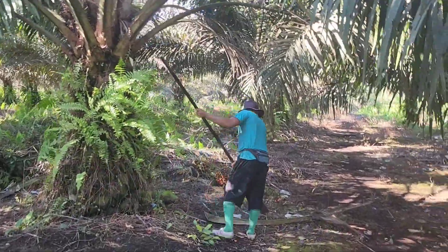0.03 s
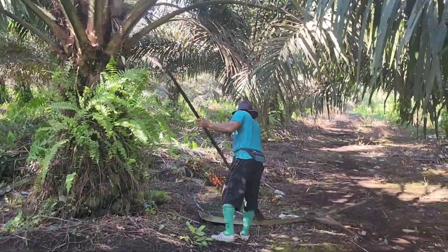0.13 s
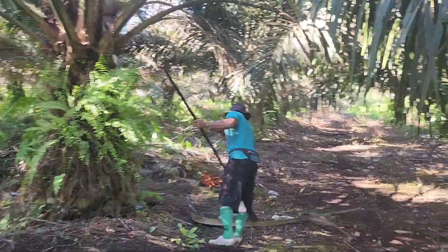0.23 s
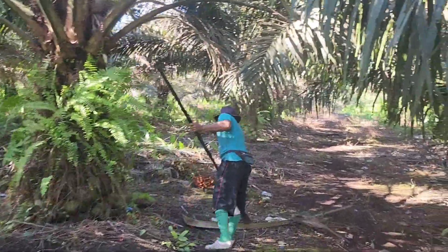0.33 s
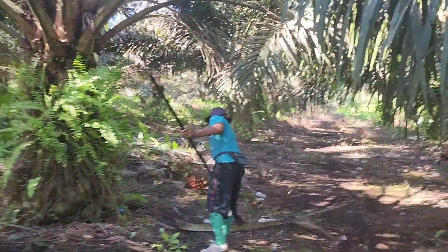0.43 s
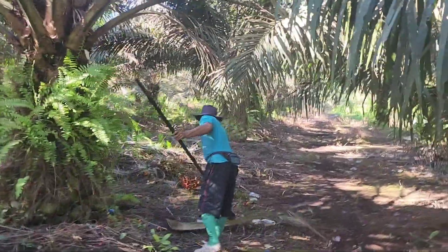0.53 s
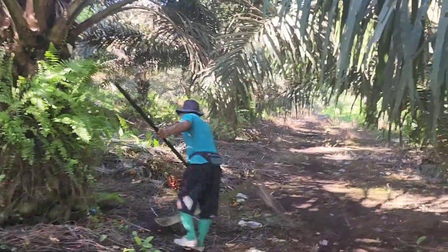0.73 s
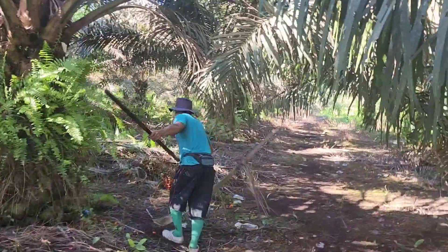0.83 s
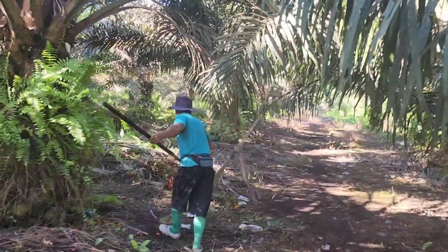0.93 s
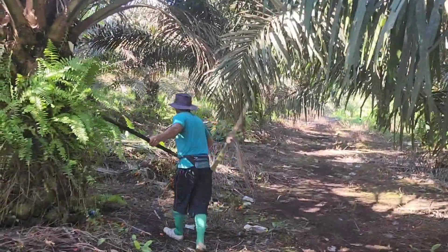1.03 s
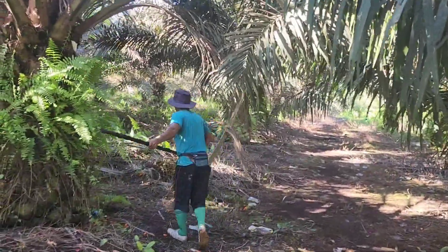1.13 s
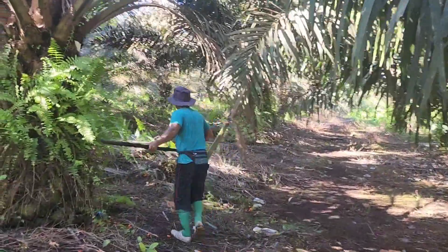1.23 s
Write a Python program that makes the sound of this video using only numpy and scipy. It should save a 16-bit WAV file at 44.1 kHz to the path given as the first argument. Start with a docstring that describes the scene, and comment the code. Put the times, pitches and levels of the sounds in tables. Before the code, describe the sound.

A woody palm frond is hit with a sharp crack while insects shrill faintly.

```python
"""Insects shrill over a low rumble, and both carry on throughout. A few metres away in a plantation,
a woody palm frond is struck with one sharp double crack. The stalk rings briefly and thuds, the leaves
splash, and the trees throw the sound back. Then a cricket starts chirping, while dry sticks knock
and fallen leaves rustle underfoot."""
import sys
import numpy as np
from scipy import signal
from scipy.fft import rfft, irfft
from scipy.io import wavfile

SR = 44100
rng = np.random.default_rng(int(sys.argv[2]) if len(sys.argv) > 2 else 0)


def transcribe(u):
    """Save the signal u as a 16-bit wav file named by the first command-line argument.

    u: samples, shape (n,) or (channels, n), limited to [-1, 1]; the rate is SR.
    q: integer samples, one column per channel.
    """
    v = np.clip(np.atleast_2d(u).T, -1, 1)
    q = np.round(v * 32767).astype(np.int16)
    wavfile.write(sys.argv[1], SR, q)


N = 57330

# Shrilling insects. Each row: pitch in Hz, band width in Hz, level in dB, rough throbs per second.
INSECT_BANDS = [(7293, 584, -51, 440), (6600, 700, -60, 84), (14340, 1400, -68.5, 80)]
# How the insects swell and sink together. Each row: time in seconds, level change in dB.
INSECT_SWELL = [(0, -0.5), (0.3, -1), (0.55, 1), (0.9, -0.5), (1.3, 1)]
# Tone of the distant rumble. Each row: frequency in Hz, relative level in dB.
RUMBLE_TONE = [(20, -14), (35, -3), (52, 0.5), (80, -2), (122, 0.5), (150, -12), (210, -16), (270, -27),
               (500, -46)]
# Tone of the hissing air. Each row: frequency in Hz, relative level in dB.
AIR_TONE = [(100, 1), (300, -3), (550, 2), (900, -2), (1500, 4.5), (2800, -1), (4500, 1.5), (6000, 2),
            (8300, 2.5), (10300, -17), (12500, -12.5), (15000, -0.5), (16000, -30)]
# The blow's two contacts. Each row: start in seconds, ring level in dB, crack level in dB,
# crack fade time in seconds, punch level in dB, snap level in dB.
BLOW_CONTACTS = [(0.2160, -38, -22, 0.046, -15.5, -14), (0.2215, -25, -19.5, 0.015, -32, -2.5)]
# The stalk's ringing notes. Each row: pitch in Hz, relative level in dB, fade time in seconds.
STALK_NOTES = [(208, -12.5, 0.075), (409, -14, 0.13), (473, -11.5, 0.046), (916, -19, .14),
               (964, -6.5, 0.059), (1170, -9, 0.045), (1286, -2, 0.05), (1730, -2.5, 0.05),
               (2434, -4.5, 0.053), (2870, -14, 0.14), (3165, 1, 0.022), (3706, -2.5, 0.049),
               (4500, 1.5, 0.031), (5300, -17, 0.13), (6116, -11, 0.16), (8330, -0.5, 0.026)]
# Tone of the crack. Each row: frequency in Hz, relative level in dB.
CRACK_TONE = [(150, -10.5), (320, -8.5), (500, 1.5), (740, -6.5), (1300, 1), (2300, -3.5), (3300, 2),
              (4500, 1), (5600, -10), (8400, 0.5), (10000, -15), (16000, -20)]
# Tone of the leaves' splash. Each row: frequency in Hz, relative level in dB.
SPLASH_TONE = [(150, 0), (450, 7), (700, -2), (1300, 2), (2300, 6.5), (4000, -1), (6000, -15), (7800, 8),
               (9500, -1), (13500, 3), (16000, -1)]
# Tone of the sound scattered by near trees. Each row: frequency in Hz, relative level in dB.
NEAR_TREES_TONE = [(120, -4.5), (200, 5), (320, -26), (440, -2), (680, -7), (1250, -1.5), (2050, -3.5),
                   (2900, -0.5), (4600, 2.5), (7500, 1), (9400, -5), (14300, -4), (16000, -5.5)]
# Tone of the far trees' long ring. Each row: frequency in Hz, relative level in dB.
FAR_TREES_TONE = [(250, -16), (440, -19), (600, -5.5), (900, 6), (1080, -6.5), (1350, -1.5), (2000, -1),
                  (3000, -2), (6000, -1.5), (9000, -21), (16000, -31)]
# Thuds of the heavy stalk. Each row: start in seconds, level in dB, pitch in Hz.
STALK_THUDS = [(0.226, -27, 61), (0.2475, -25, 91.6), (0.272, -38, 127), (0.293, -37.5, 152)]
# Echoes from single palms. Each row: delay in seconds, dB relative to the blow, strongest pitch in Hz.
PALM_ECHOES = [(0.076, -22.5, 1290), (0.116, -25, 964), (0.157, -38.5, 853), (0.181, -33, 2090)]
# Cricket chirps. Each row: start in seconds, level in dB.
CRICKET_CHIRPS = [(0.34, -65), (0.495, -62), (0.665, -63.5), (0.814, -60), (0.976, -58.5), (1.127, -60.5),
                  (1.28, -56)]
# Knocks of dry sticks. Each row: start in seconds, ring level in dB, grit level in dB,
# pitch in Hz, ring fade time in seconds.
STICK_KNOCKS = [(0.5005, -62, -50.5, 1428, 0.025), (0.5065, -45, -52, 1370, .014),
                (0.5585, -27, -55, 1367, 0.0079), (0.567, -52, -51.5, 1960, 0.021),
                (0.609, -47.5, -62.5, 1290, 0.019), (0.745, -54.5, -58, 1280, 0.039),
                (0.834, -59, -56.5, 1750, 0.024), (0.8614, -35, -61, 1590, 0.0095),
                (1.1908, -71, -53, 1160, 0.042), (1.253, -76, -55.5, 1800, 0.027),
                (1.292, -50, -54, 1500, 0.027), (1.295, -51, -48.5, 2660, 0.02)]
# Scuffs through fallen leaves. Each row: middle in seconds, length in seconds, level in dB,
# tilt towards the treble in dB per octave.
LEAF_SCUFFS = [(0.571, 0.058, -61, -2.5), (0.64, 0.053, -54, 1), (0.784, 0.14, -56.5, -0.5),
               (1.144, 0.028, -61, -3), (1.199, 0.015, -52.5, 2.3), (1.297, 0.028, -55, -4)]
# Tone of the fallen leaves. Each row: frequency in Hz, relative level in dB.
LITTER_TONE = [(200, -6), (600, -6), (1400, 3.5), (2500, -2.5), (4200, 1.5), (6000, 1), (8300, -1),
               (10000, -7), (16000, -2.5)]


def undb(db):
    """Turn decibels into a number to multiply by."""
    return 10 ** (np.asarray(db) / 20)


def since(start):
    """Seconds since a moment, zero before it."""
    return np.maximum(np.arange(N) / SR - start, 0)


def fade(start, fade_s, rise_s=0.00045):
    """Rise, then die away; the fade time is how long a drop of 60 dB takes."""
    t = since(start)
    return (1 - np.exp(-t / rise_s)) * np.exp(-np.log(1000) * t / fade_s)


def ring(start, hz, fade_s, rise_s=0.00047):
    """One pure note that dies away."""
    return np.sin(2 * np.pi * hz * since(start)) * fade(start, fade_s, rise_s)


def unit(x):
    """Scale a sound to an average power of 1."""
    return x / np.sqrt(np.mean(x ** 2))


def pan(db):
    """Make the left ear db louder than the right; below zero leans right."""
    return undb(np.array([[db], [-db]]) / 2)


def colour(x, tone):
    """Shape a sound with a tone table; white noise would keep its power."""
    hz = np.maximum(np.fft.rfftfreq(2 * N, 1 / SR), 1)
    tone_hz, tone_db = np.array(tone).T
    gain = unit(undb(np.interp(np.log(hz), np.log(tone_hz), tone_db)))
    # These steps keep the filter from sounding before its input does.
    cepstrum = irfft(np.log(gain))[:N]
    cepstrum[1:] *= 2
    response = np.exp(rfft(cepstrum, 2 * N))
    return irfft(rfft(x, 2 * N) * response)[..., :N]


def band(x, hz, width_hz):
    """Keep the frequencies around one pitch, at an average power of 1."""
    distance = (np.fft.rfftfreq(N, 1 / SR) - hz) / width_hz
    peak = rfft(x) / (1 + (distance * 2) ** 2)
    return unit(irfft(peak / np.sqrt(1 + (distance / 2) ** 2), N))


def noise(width):
    """Stereo hiss: width 0 is centred, width 1 is unrelated in each ear."""
    mid, side = rfft(rng.standard_normal((2, N)))
    ears = np.array([mid + width * side, mid - width * side])
    return irfft(ears / np.sqrt(1 + width ** 2), N)


def diffuse(width, wide_hz=2310):
    """Scattered hiss: alike in both ears in the bass, as wide as given in the treble."""
    return noise(width * np.clip(np.fft.rfftfreq(N, 1 / SR) / wide_hz, 0.1, 1))


def insects():
    """Many insects blur into shrill, throbbing bands of noise."""
    out = 0
    for hz, width_hz, db, rate in INSECT_BANDS:
        throb = 1 + 0.25 * band(rng.standard_normal(N), rate, rate / 2)
        shrill = band(noise(width=0.89), hz, width_hz)
        out += undb(db) * unit(shrill * throb) * pan(-2 if hz < SR / 4 else 1.5)
    swell_db = np.interp(since(0), *np.array(INSECT_SWELL).T)
    return out * undb(swell_db)


def grove():
    """A distant rumble lies under the faint hiss of the air."""
    rumble = unit(colour(noise(width=0.15), RUMBLE_TONE))
    air = colour(diffuse(width=1.0), AIR_TONE)
    return undb(-55.5) * rumble + undb(-61.5) * air


def blow():
    """Each contact punches, cracks and snaps the fibres, and sets the stalk ringing."""
    out = 0
    for start, ring_db, crack_db, crack_fade_s, punch_db, snap_db in BLOW_CONTACTS:
        stalk = sum(undb(db) * ring(start, hz, fade_s) for hz, db, fade_s in STALK_NOTES)
        crack = colour(diffuse(width=0.55) * fade(start, crack_fade_s), CRACK_TONE)
        snap = ring(start + 0.000982, hz=3250, fade_s=0.00073, rise_s=0.00005) * pan(db=-5)
        punch = -ring(start, hz=460, fade_s=0.0095)
        out += (undb(ring_db) * stalk + undb(crack_db) * crack) * pan(db=-2)
        out += undb(snap_db) * snap + undb(punch_db) * punch
    return out


def from_right(x, delay_s=0.00003):
    """A sound a little to the right reaches the left ear later."""
    left, right = x
    delay = np.exp(-2j * np.pi * np.fft.rfftfreq(N, 1 / SR) * delay_s)
    return np.array([irfft(rfft(left) * delay, N), right])


def foliage():
    """The leaves splash with the blow; near and far trees scatter its sound back."""
    start = BLOW_CONTACTS[0][0]
    splash = colour(diffuse(width=1.14) * fade(start, fade_s=0.11, rise_s=0.004), SPLASH_TONE)
    near = colour(diffuse(width=1.17) * fade(start, fade_s=0.29, rise_s=0.02), NEAR_TREES_TONE)
    far = colour(diffuse(width=1.3) * fade(start, fade_s=0.96, rise_s=0.097), FAR_TREES_TONE)
    return (undb(-24) * splash + undb(-25.5) * near + undb(-45.5) * far) * pan(db=-1.1)


def thuds():
    """The heavy stalk makes low bumps that die quickly."""
    return -sum(undb(db) * ring(start, hz, fade_s=0.043, rise_s=0.0017) for start, db, hz in STALK_THUDS)


def echoes(hit):
    """Nearby palms throw back dull, smeared copies of the blow."""
    out, mono = 0, hit.mean(axis=0)
    for delay, db, hz in PALM_ECHOES:
        fronds = noise(width=0.52) * fade(delay, fade_s=0.024)
        smeared = signal.fftconvolve(fronds, mono[None], axes=1)[:, :N]
        out += undb(db) * np.std(mono) * band(smeared, hz, hz / 2)
    return out


def cricket(chirp_s=0.076, pulse_hz=88):
    """A cricket gives short, pulsing chirps, about six a second."""
    loudness = 0
    for start, db in CRICKET_CHIRPS:
        t = np.minimum(since(start), chirp_s)
        arch = np.sqrt(np.abs(np.sin(np.pi * t / chirp_s)))
        pulses = 1 - 0.14 * np.cos(2 * np.pi * pulse_hz * t)
        loudness += undb(db) * arch * pulses
    return loudness * band(noise(width=0.85), hz=5430, width_hz=230)


def sticks():
    """Each dry stick knocks with one short ring and a little gritty noise."""
    out = 0
    for start, ring_db, grit_db, hz, fade_s in STICK_KNOCKS:
        knock = ring(start, hz, fade_s, rise_s=0.00094)
        grit = band(noise(width=0.82), hz, hz * 0.78) * fade(start, fade_s * 1.57)
        out += undb(ring_db) * knock + undb(grit_db) * grit
    return out * pan(db=-4.5)


def leaf_litter(grains_per_s=5000, spread_db=0.5, pivot_hz=5000):
    """Steps stir fallen leaves into swells of tiny crackles, some dull, some crisp."""
    t, out = since(0), 0
    grains = rng.random(N) < grains_per_s / SR
    strength = undb(spread_db * rng.standard_normal(N))
    crackle = unit(grains * strength * noise(width=0.86))
    for middle, length, db, tilt in LEAF_SCUFFS:
        swell = np.exp(-2 * ((t - middle) / length) ** 2)
        tone = [(hz, level + tilt * np.log2(hz / pivot_hz)) for hz, level in LITTER_TONE]
        out += undb(db) * colour(crackle * swell, tone)
    return out


def scene():
    """Add up the blow, the sounds underfoot and the living grove around them."""
    hit = blow()
    strike = from_right(hit) + echoes(hit) + foliage() + thuds()
    underfoot = sticks() + leaf_litter()
    return strike + underfoot + insects() + cricket() + grove()


def record(dry, top_hz=15800):
    """Cut away the very highest treble."""
    return signal.sosfilt(signal.ellip(10, 0.2, 80, top_hz, fs=SR, output="sos"), dry)


dry = scene()
out = record(dry)
transcribe(out)
```